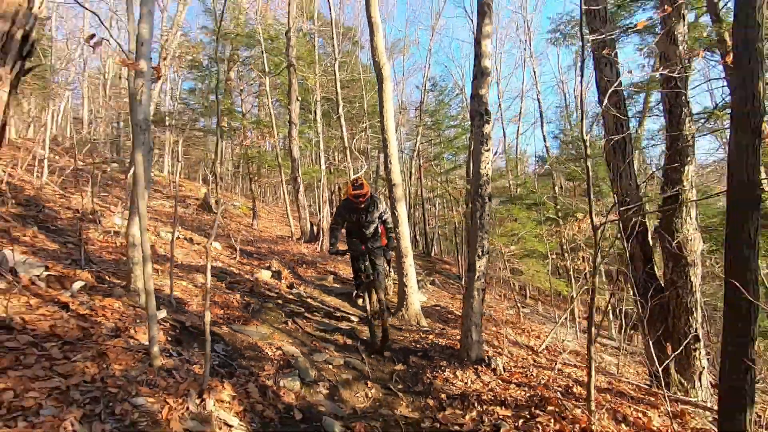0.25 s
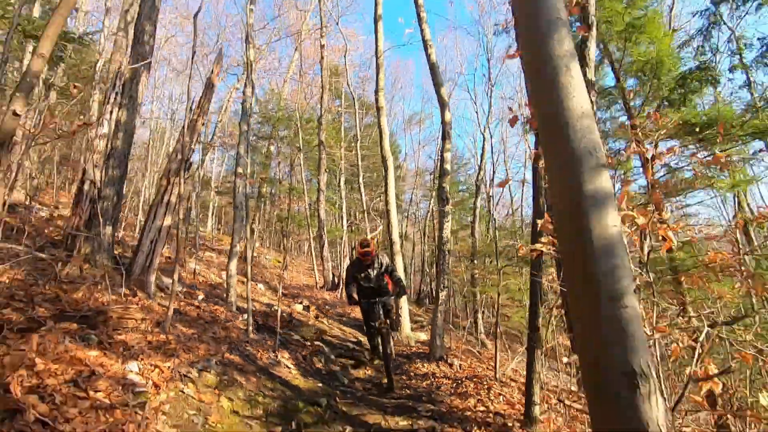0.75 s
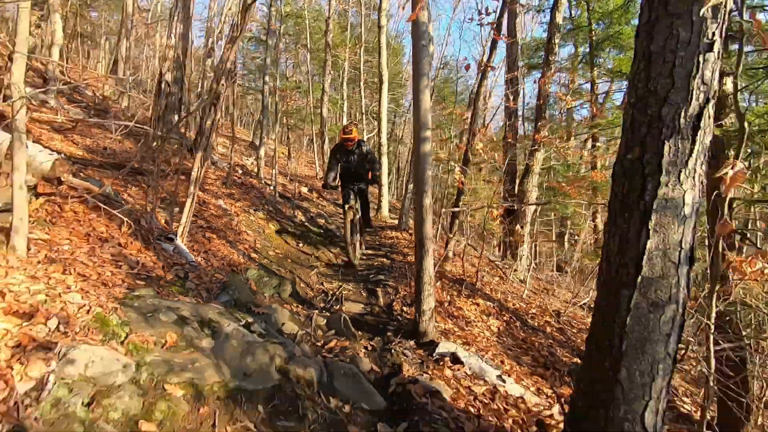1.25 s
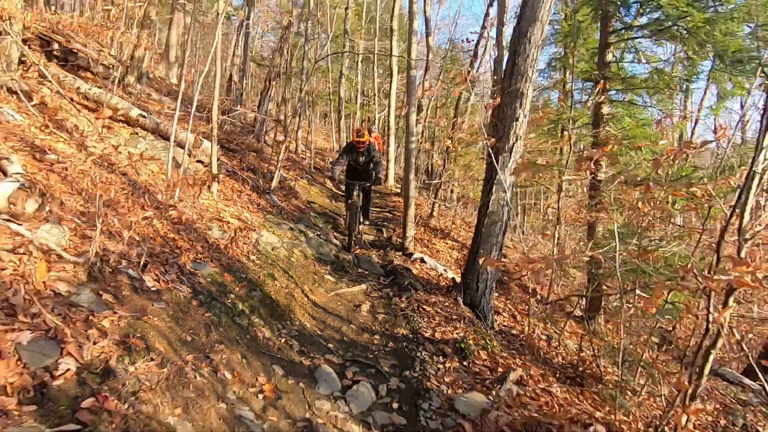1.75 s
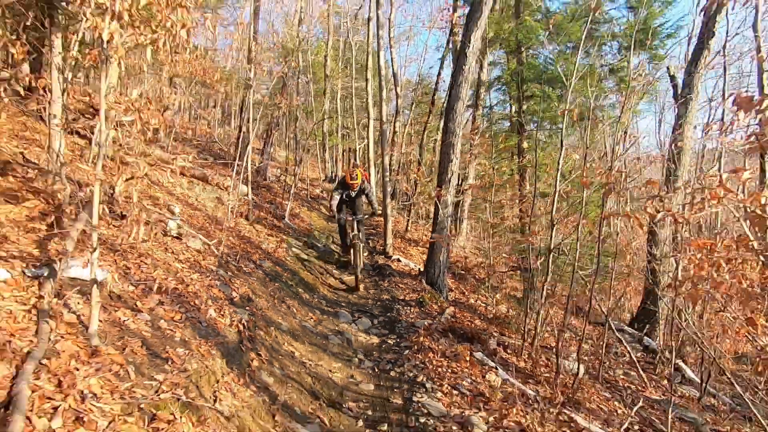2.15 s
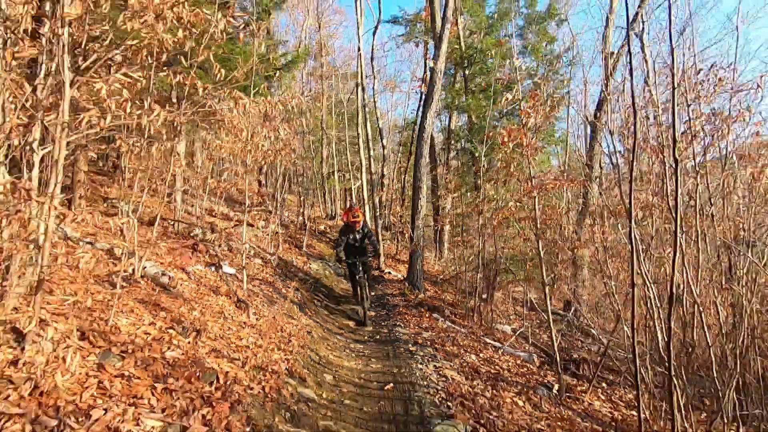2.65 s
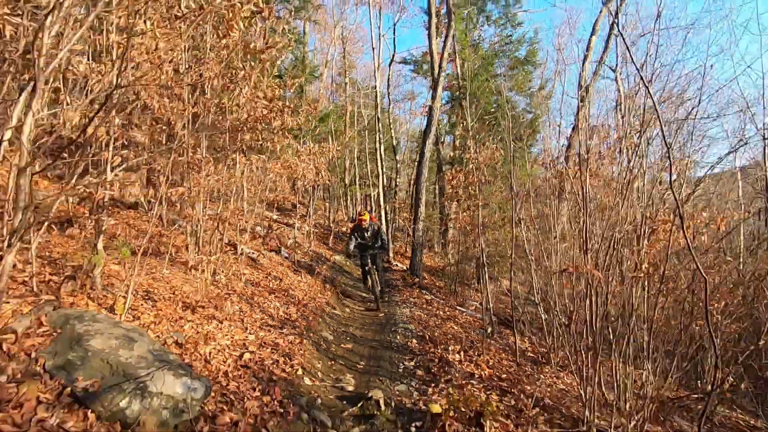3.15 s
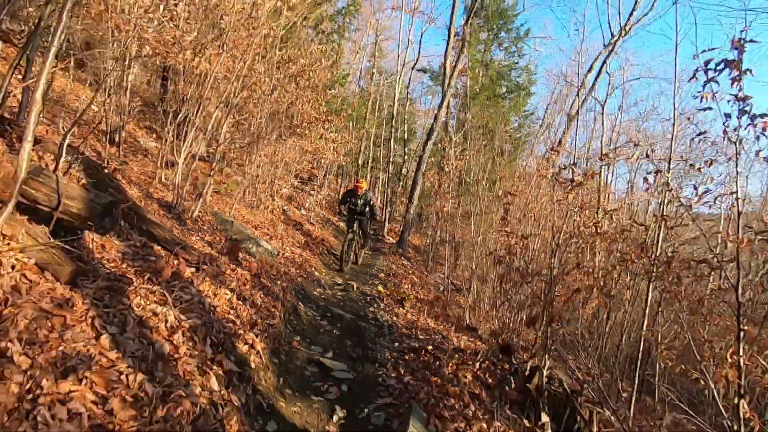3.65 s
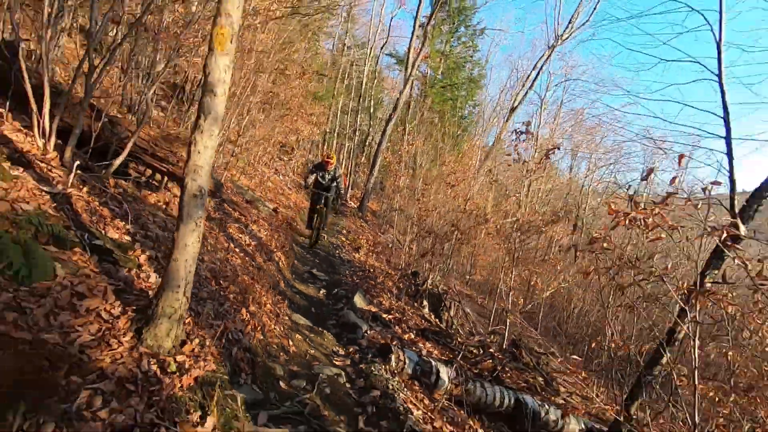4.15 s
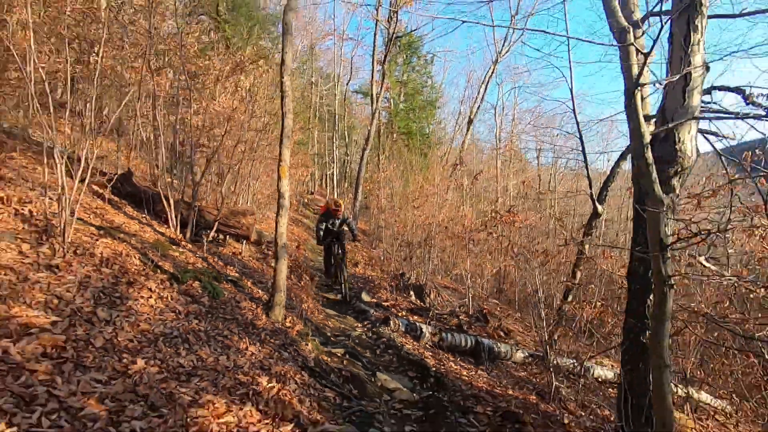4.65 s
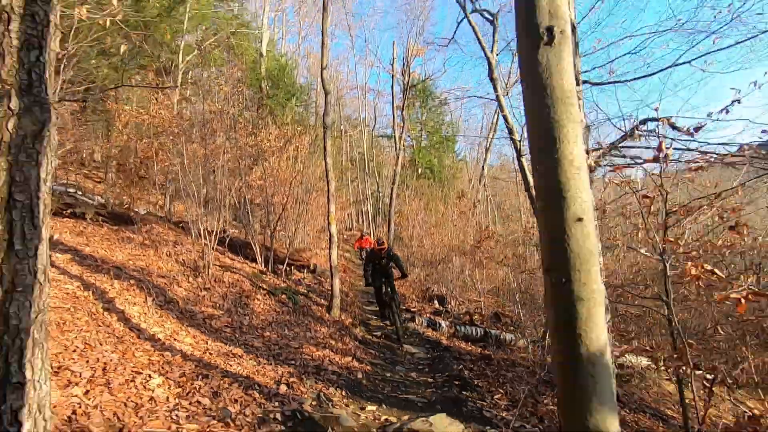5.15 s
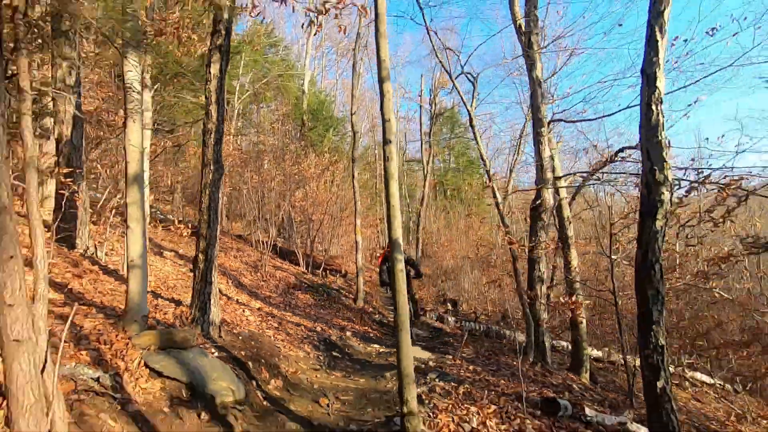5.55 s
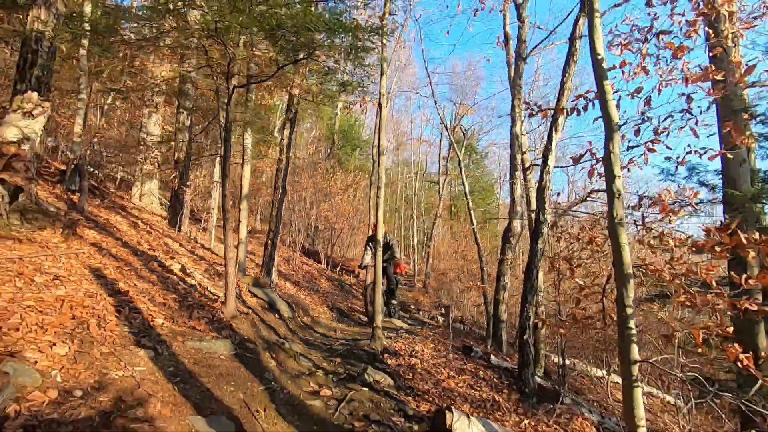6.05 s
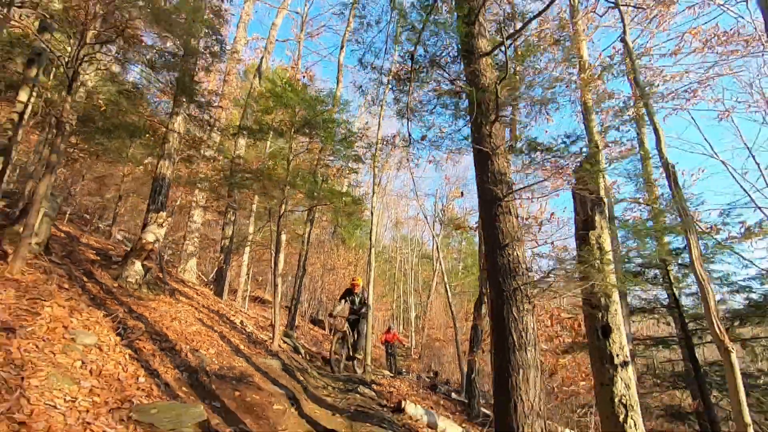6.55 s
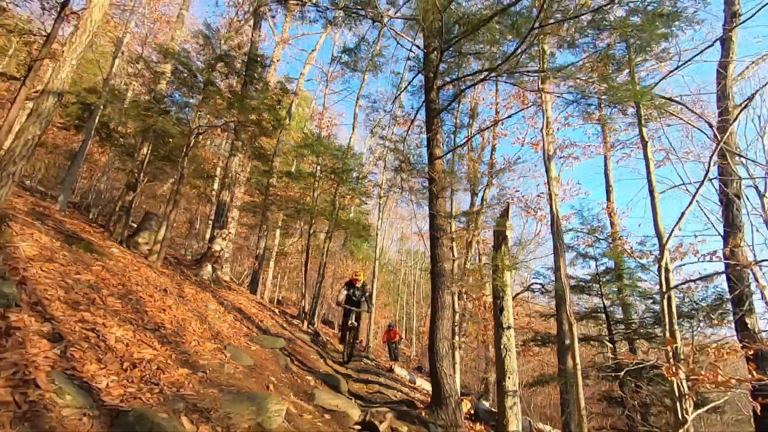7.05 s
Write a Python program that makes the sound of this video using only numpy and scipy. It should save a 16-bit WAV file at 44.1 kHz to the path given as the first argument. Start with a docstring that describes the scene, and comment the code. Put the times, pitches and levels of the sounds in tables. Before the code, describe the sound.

A covered microphone rides a mountain bike down a steep, leaf-strewn forest trail; everything is close, dry and dull in the top treble. From 0 to 1.3 s, uneven low wind flutters and thumps while loose parts tick often, with a hard frame knock near 0.65 s and a bright clack at 0.9 s. Rattles thin out until about 1.9 s. Wind strengthens, with heavy buffets near 2.2, 2.85, 3.05, 4.0 and 4.45 s, brief dropouts between, and scattered dull knocks. Around 4.9 to 5.6 s the wind eases, exposing tyre hiss, leaf crackle and denser ticking. Buffets return from 5.75 s, with a strong knock at 6.2 s, a rattle at 6.3 s and a heavy push near 6.5 s. The sharpest metallic clatter hits around 6.82 to 6.88 s with a leaf surge. Ticks cluster near 7.1 s, and a duller swell of leaf noise ends it at 7.3 s.

```python
"""Wind on a microphone that rides a mountain bike down a steep forest trail: eddies pass as random swings
of pressure, their strength set by gusts, and single strong eddies push and rebound.
Close below, tyres hiss and crackle through dry leaves: coloured noise and small ringing ticks.
Loose parts of the bike rattle as noisy ticks that ring damped modes; knocks through the frame ring one.
The covered microphone dulls the top treble."""
import sys
import numpy as np
from scipy import signal
from scipy.io import wavfile
from scipy.ndimage import uniform_filter1d

SR = 44100
rng = np.random.default_rng(int(sys.argv[2]) if len(sys.argv) > 2 else 0)


def persist_wave(psi):
    """Save psi, clipped to +-1, as 16-bit WAV."""
    counts = np.round(np.clip(psi, -1, 1) * 32767).astype(np.int16)
    wavfile.write(sys.argv[1], SR, np.atleast_2d(counts).T)


N = 321776

# Gusts at the microphone: peak_s, length_s, large_eddies_db, small_eddies_db
GUSTS = [(0.026, 0.043, -25.5, -32), (0.111, 0.49, -47.5, -36.5), (0.184, 0.23, -28.5, -35.5),
         (0.422, 0.47, -35, -34), (0.567, 0.16, -22.5, -28), (0.653, 0.32, -25.5, -32.5),
         (0.798, 0.28, -23, -25.5), (0.864, 0.07, -22, -48), (1.007, 0.37, -24, -28),
         (1.13, 0.067, -26, -38), (1.176, 0.2, -20.5, -23), (1.248, 0.077, -27, -51),
         (1.301, 0.04, -25, -33), (1.382, 0.29, -19.5, -28.5), (1.466, 0.22, -21, -29.5),
         (1.59, 0.09, -39, -33), (1.753, 0.014, -24, -30), (1.793, 0.44, -26, -40.5),
         (1.96, 0.029, -17, -44), (2.02, 0.032, -28, -45), (2.055, 0.046, -24, -27),
         (2.097, 0.14, -22, -31), (2.147, 0.037, -50, -28.5), (2.206, 0.063, -11.5, -24),
         (2.504, 0.068, -28, -25), (2.578, 0.073, -28, -29), (2.656, 0.13, -21, -44),
         (2.666, 0.12, -29, -31), (2.76, 0.13, -26, -31.5), (2.848, 0.23, -16.5, -20.5),
         (2.937, 0.073, -18.5, -32), (3.05, 0.19, -23, -34.5), (3.221, 0.058, -26, -35.5),
         (3.379, 0.12, -23.5, -30), (3.488, 0.045, -22, -41), (3.56, 0.066, -27, -28.5),
         (3.645, 0.17, -25.5, -27.5), (3.743, 0.062, -18, -38), (3.795, 0.042, -32, -26),
         (3.831, 0.23, -18.5, -31), (3.896, 0.11, -33, -27.5), (4.013, 0.076, -16, -24.5),
         (4.05, 0.36, -23, -33.5), (4.214, 0.068, -24, -51), (4.386, 0.12, -19, -36.5),
         (4.462, 0.058, -11, -27.5), (4.642, 0.085, -18.5, -30), (4.707, 0.039, -38, -34.5),
         (4.908, 0.26, -35, -42.5), (5.102, 0.51, -53, -39.0), (5.272, 0.38, -34.5, -35.5),
         (5.474, 0.48, -32.5, -30.5), (5.672, 0.26, -29.5, -31.5), (5.757, 0.089, -22, -23.5),
         (5.832, 0.084, -21, -24), (5.933, 0.3, -22, -33), (6.11, 0.17, -24, -33.5),
         (6.228, 0.22, -29, -34.5), (6.362, 0.095, -20.5, -32), (6.482, 0.22, -21.5, -26.5),
         (6.714, 0.12, -23.5, -28.5), (6.809, 0.29, -27.5, -33), (7.044, 0.12, -33, -37),
         (7.178, 0.28, -29.5, -36), (7.281, 0.067, -25, -20)]
# Slowly changing wind level beneath the gusts: time_s, large_eddies_db
WIND_BETWEEN_GUSTS = [(0.0, -43), (1.22, -36.5), (2.43, -26), (3.65, -32), (4.87, -35.5), (6.08, -46.5),
                      (7.3, -29.5)]
# Moments when the wind drops out: centre_s, half_length_s, depth_db
WIND_DROPS = [(1.08, 0.027, -9.5), (2.785, 0.0096, -8.5), (2.923, 0.021, -14), (3.03, 0.014, -15),
              (3.187, 0.029, -5.5), (3.77, 0.024, -8.5), (3.953, 0.043, -3.5), (4.187, 0.016, -8),
              (4.668, 0.02, -12), (4.836, 0.04, -6.5), (5.035, 0.023, -6), (6.052, 0.057, -5.5)]
# Eddy sizes: swing_hz, level_db (on the gust level), small_eddy_share (0 follows the large eddies, 1 the
# small; beyond 1 overshoots), density (mean eddies per swing), flutter_db (negative swells in opposition)
EDDY_SIZES = [(31, -4.5, 0.11, 2.1, 6.5), (50.5, -5.5, 0.012, 1.4, -2.5), (90.4, -2, 0.11, 1.1, 3),
              (162, -5, 0.26, 1.1, 4.5), (287.3, -4, 0.65, 1.1, 6), (471.6, -4, 1.035, 1.1, 6),
              (876, -7, 1.51, 1.1, 6), (1400, -13.5, 1.47, 0.9, 9)]
# Tyres in leaf litter: time_s, level_db (relative), crispness (dB per octave above 3 kHz)
TYRES_IN_LEAVES = [(0.0, -48.5, 9), (0.13, -50.5, 0.5), (0.3, -44, 4.5), (0.55, -43.5, 4), (0.8, -48, 10),
                   (1.0, -45, 5), (1.2, -50.5, 5.5), (1.36, -48, 4.5), (1.68, -50.5, 2), (1.95, -48, 2),
                   (2.28, -51.5, 1.5), (2.44, -46, 4), (2.63, -49.5, 0.5), (2.8, -49, 4),
                   (3.27, -51.5, 5.5), (3.4, -47, 5.5), (3.54, -54, 5), (3.75, -53.5, 6), (4.07, -46, 3.5),
                   (4.3, -54, 2), (4.5, -52, 4), (4.63, -48.5, 3.5), (4.85, -49.5, 0.5), (5.0, -46.5, 0),
                   (5.18, -47.5, 7), (5.5, -46.5, 4.5), (5.75, -46.5, 3.5), (6.1, -50, -1), (6.27, -43, 5),
                   (6.5, -46, 5.5), (6.66, -50.5, 0), (6.82, -39.5, 4), (6.94, -49, 0.5), (7.12, -47, -4),
                   (7.25, -53.5, 4.5), (7.3, -31.5, -8)]
# Colour of leaf litter as heard through the microphone: frequency_hz, density_db (relative, per Hz)
LITTER_COLOUR = [(350, -29), (600, -1.5), (1130, -1), (1610, -2.5), (2180, -4.5), (3140, -4.5),
                 (4500, -13.5), (5400, -17.5), (6510, -22.5), (8010, -24), (9850, -31.5), (11000, -39.5),
                 (14300, -54), (22000, -120)]
# Single strong eddies: centre_s, level_db (before trim), swing_hz
STRONG_EDDIES = [(0.0248, -20.5, 247), (0.1237, -18, 382), (0.212, -16, 149), (0.397, -17, 214),
                 (0.4607, -15, 174), (0.5565, -18, 221), (0.5739, -14, 241), (0.599, -13, 158),
                 (0.62, -29, 170), (1.186, -21, 197), (1.202, -14, 333), (1.372, -17, 109),
                 (1.389, -12, 174), (1.6119, -20.5, 182), (1.791, -15, 292), (1.855, -21, 174),
                 (2.2091, -23, 158), (2.238, -24, 122), (2.5145, -12, 413), (2.5924, -12.5, 380),
                 (2.6683, -19, 147), (2.7078, -14, 168), (2.828, -10, 218), (2.865, -7, 144),
                 (2.873, -10, 265), (2.879, -10, 258), (3.046, -11.5, 247), (3.059, -7, 77.5),
                 (3.5677, -20.5, 220), (3.6226, -21, 360), (3.8085, -13.5, 179), (3.836, -23, 161),
                 (3.908, -15, 228), (4.0045, -11.5, 151), (4.026, -21, 91), (4.391, -22, 145),
                 (4.409, -13, 186), (4.459, -13, 166), (4.4729, -12.5, 190), (4.6434, -15.5, 123),
                 (4.969, -22, 242), (5.092, -22.5, 158), (5.6868, -15.5, 200), (5.7568, -22, 493),
                 (5.8348, -11.5, 172), (5.9412, -20, 129), (5.9568, -24, 206), (6.109, -10, 143),
                 (6.225, -17.5, 155), (6.368, -17.5, 121), (6.4728, -10, 106), (6.4877, -7, 188),
                 (6.7062, -27, 282), (6.8246, -25, 300), (6.8493, -17, 370), (6.912, -25, 200)]
# Rattles: tick_s, treble_peak_db (before trim), low_parts_db, high_parts_db, struck_part_hz
RATTLE_HITS = [(0.045, -38, 23, -24, 4080), (0.1665, -30, -5, -15, 2900), (0.199, -30.5, -9, -2, 8100),
               (0.266, -31, 13, 2, 2820), (0.317, -31, 2, 3, 2900), (0.3362, -22.5, 18, -9, 3470),
               (0.405, -31, -7, -2, 3600), (0.4424, -29.5, 0, -1, 2790), (0.459, -36, 2, -11, 3480),
               (0.5, -30, 2, -3, 3570), (0.511, -28, 1, -3, 2650), (0.567, -26, -1, 1, 7210),
               (0.576, -37, 2, 1, 3320), (0.7368, -23, 8, -15, 4100), (0.75, -23, -4, -6, 3530),
               (0.8, -20, -13, 0, 8330), (0.9001, -13, -20, 20, 3300), (0.907, -27, -5, 5, 2700),
               (0.949, -25, -15, -3, 5030), (0.9525, -25, -17, 5, 4500), (0.9917, -39, 8, -20, 2700),
               (1.063, -29, -8, -21, 3970), (1.2067, -26.5, -8, -4, 3850), (1.227, -33.5, -9, -17, 2720),
               (1.274, -36, 15, -17, 2800), (1.711, -39.5, 0, -26, 2500), (1.802, -42, 0, -25, 2400),
               (1.8788, -26, 3, -28, 4600), (2.151, -33, 19, -30, 4470), (2.285, -39, 14, -25, 3060),
               (2.323, -31.5, 5, -28, 3650), (2.336, -31, 0, -26, 4270), (2.35, -39, 10, -22, 2740),
               (2.4352, -32.5, 26, -21, 3000), (2.5, -32, 8, -28, 2630), (2.535, -35.5, -15, -25, 2780),
               (2.6656, -27, 1, -7, 4030), (2.727, -28.5, -6, -20, 3480), (2.7848, -34.5, -15, 0, 2860),
               (2.823, -32.5, 3, -14, 2530), (2.8632, -35, 22, -20, 2370), (2.982, -37.5, 0, -10, 3530),
               (3.063, -44, 21, -15, 2690), (3.105, -42, 19, -14, 3200), (3.196, -36.5, -14, -8, 2610),
               (3.351, -27, 3, -27, 3440), (3.3926, -33, -5, -5, 2460), (3.505, -32.5, -7, -1, 3500),
               (3.6854, -28, 2, -19, 4660), (3.737, -31.5, 2, 0, 3560), (3.812, -30.5, -8, -8, 3880),
               (3.869, -29.5, 5, 5, 4630), (3.89, -38, 10, -17, 2700), (3.9117, -30.5, -7, -20, 5070),
               (4.065, -32, 32, -18, 2440), (4.105, -30, 23, -15, 4350), (4.2783, -37, -12, -11, 2630),
               (4.331, -26.5, -15, -13, 7100), (4.372, -37, 1, -16, 2930), (4.439, -33.5, -11, -2, 3430),
               (4.543, -32, -12, -18, 3280), (4.5783, -33.5, 11, -15, 3000), (4.9668, -33, 7, -19, 5350),
               (5.0623, -23.5, 0, -4, 7100), (5.19, -34.5, -9, -11, 2700), (5.226, -36, -8, -6, 3930),
               (5.267, -32, 1, -12, 2780), (5.282, -25.5, -21, -7, 3000), (5.3072, -30, -10, -3, 2920),
               (5.3932, -25, -7, 11, 7200), (5.428, -25.5, -8, -1, 4030), (5.518, -28, -3, 0, 5350),
               (5.528, -31, 10, 0, 4900), (5.681, -32, 2, -6, 2870), (5.734, -29.5, -5, -12, 3100),
               (5.7964, -35, -10, -17, 4700), (5.868, -26.5, -9, -12, 4500), (6.033, -29.5, 4, 0, 5760),
               (6.08, -31.5, -6, 6, 5430), (6.105, -38, 13, 14, 2440), (6.17, -26, -0.5, -7, 2900),
               (6.29, -17.5, -8, 10, 2500), (6.3402, -30, 0, -1, 8100), (6.3462, -26, -11, -4, 3300),
               (6.404, -35, 5, 5, 3060), (6.429, -27.5, -10, -4, 7170), (6.5075, -26.5, 7, -16, 2360),
               (6.5425, -25, 4, -5, 8240), (6.5922, -20, -12, 6, 7500), (6.743, -40, -3, 0, 2960),
               (6.807, -30, 7, -2, 3970), (6.819, -7, -3, 10, 5340), (6.8299, -14, 8, 10, 8600),
               (6.836, -33, 0, 0, 5300), (6.8833, -16.5, -4, 21, 9600), (6.916, -33, 8, -9, 4350),
               (7.041, -29, 8, -14, 4450), (7.0658, -26, -8, -27, 4000), (7.097, -24.5, -3, -5, 4670),
               (7.106, -20.5, 1, -1, 4270), (7.118, -22.5, -18.5, 7, 4700)]
# Modes of the loose parts: frequency_hz, width_hz (wider dies sooner), level_db (relative)
LOOSE_PARTS = [(1700, 120, 10.5), (2780, 280, 17), (4270, 900, 17), (5260, 1300, 15), (7100, 2800, 16.5),
               (8330, 4100, 17.5), (11000, 1200, -16), (13500, 3000, 6)]
# Knocks through the frame: time_s, level_db (before trim), mode_hz, t60_s (at least 5 ms is used)
FRAME_KNOCKS = [(0.1021, -28, 790, 0.036), (0.2654, -26, 1617, 0.056), (0.336, -31.5, 1440, 0.21),
                (0.6446, -14, 885, 0.022), (0.8175, -30, 920, 0.048), (0.856, -35.5, 1140, 0.043),
                (0.9035, -23, 5600, 0.039), (0.985, -27, 1130, 0.04), (1.1645, -18, 686, 0.016),
                (1.341, -20, 914, 0.043), (1.348, -25, 1530, 0.054), (1.362, -23, 1400, 0.063),
                (1.565, -27, 1490, 0.027), (1.655, -25.5, 1340, 0.02), (1.879, -25.5, 680, 0.031),
                (1.8797, -19, 1840, 0.02), (2.0516, -21.5, 736, 0.013), (2.201, -34, 1230, 0.02),
                (2.2252, -20, 750, 0.029), (2.5141, -22.5, 700, 0.044), (2.7482, -22, 765, 0.025),
                (2.809, -27, 910, 0.017), (2.826, -24, 1690, 0.015), (2.83, -14.5, 890, 0.022),
                (2.844, -38, 900, 0.02), (2.864, -13, 890, 0.017), (2.8785, -23, 887, 0.04),
                (3.104, -25, 660, 0.031), (3.3487, -23, 1400, 0.027), (3.394, -20.5, 725, 0.022),
                (3.5729, -31, 1000, 0.043), (3.620, -24.5, 710, 0.017), (3.638, -35, 1700, 0.016),
                (3.6536, -25, 1160, 0.03), (3.7905, -23.5, 696, 0.018), (3.799, -36, 810, 0.021),
                (3.8983, -42, 785, 0.04), (4.003, -22, 786, 0.032), (4.066, -24, 945, 0.025),
                (4.372, -30.5, 1510, 0.03), (4.622, -28.5, 1110, 0.031), (4.691, -23.5, 1380, 0.028),
                (4.971, -21.5, 858, 0.047), (5.054, -22, 910, 0.043), (5.311, -17.5, 874, 0.031),
                (5.409, -22.5, 890, 0.04), (5.421, -25, 1020, 0.037), (5.436, -24, 870, 0.03),
                (5.4873, -19.5, 654, 0.043), (5.567, -24, 1005, 0.034), (5.764, -18.5, 1176, 0.026),
                (5.864, -28, 1400, 0.032), (5.9184, -26.5, 1400, 0.032), (6.154, -21, 900, 0.028),
                (6.2199, -11.5, 875, 0.022), (6.471, -24, 840, 0.033), (6.511, -16.5, 980, 0.047),
                (6.71, -20, 1322, 0.065), (6.796, -24.5, 1037, 0.064), (6.874, -28, 1943, 0.09),
                (6.8835, -16, 1917, 0.037), (6.93, -21, 1150, 0.018), (7.0527, -27, 940, 0.12),
                (7.276, -22, 1024, 0.032), (7.285, -28, 790, 0.024)]
# Treble response of the covered microphone: frequency_hz, gain_db
MICROPHONE_RESPONSE = [(9500, -2), (10600, -12.5), (11200, -18.5), (12000, -23), (14500, -19), (15600, -38)]

RISE_SHARE = 0.35  # share of a gust's length on the rising side
LARGE_DROP_DB, SMALL_DROP_DB = 15, 26.5  # fall from the peak at one rise or decay length
SMALL_BETWEEN_DB = -18  # small eddies against large ones beneath the gusts
CLEAN_HZ = 1200  # knocks above this ring with less roughness
EDGE_HZ = 15700  # upper band limit


def gain_of(db):
    """Amplitude gain of a level in dB."""
    return 10 ** (np.asarray(db) / 20)


def evened(x):
    """Scale a signal to an RMS of one."""
    return x / np.sqrt(np.mean(x ** 2) + 1e-20)


def read(points, hz):
    """Read a response curve between its points on a log-frequency axis."""
    f, value = np.transpose(points)
    return np.interp(np.log(hz + 1), np.log(f + 1), value)


def follow(rows, t):
    """Join each column of timed rows with straight lines."""
    s, *columns = np.transpose(rows)
    return [np.interp(t, s, column) for column in columns]


def add(mix, s, sound):
    """Lay a sound into the mix at s seconds, cut at the end."""
    part = mix[max(round(s * SR), 0):][:len(sound)]
    part += sound[:len(part)]


def wander(hz):
    """Smooth chance: noise kept to variations slower than about hz."""
    return evened(signal.lfilter(*signal.butter(2, hz, fs=SR), rng.standard_normal(N)))


def swing(hz, turns, phase):
    """A short swing of pressure under a bell-shaped window, with no net push."""
    u = np.arange(-3 * turns, 3 * turns, hz / SR)
    bell = np.exp(-0.5 * (u / turns) ** 2)
    wave = bell * np.cos(2 * np.pi * u + phase)
    return wave - bell * wave.sum() / bell.sum()


def gusts():
    """Each gust rises fast and dies slower; small eddies fall further from their peak than large ones."""
    t = np.arange(0, N + 128, 128) / SR
    s, length, large_db, small_db = np.transpose(GUSTS)
    u = (t[:, None] - s) / length
    away = np.where(u < 0, -u / RISE_SHARE, u / (1 - RISE_SHARE)) ** 1.45
    between_db, = follow(WIND_BETWEEN_GUSTS, t)

    def power(peak_db, drop_db, under_db):
        """Overlapping gusts and the wind beneath them add as powers."""
        gust_power = (gain_of(peak_db - drop_db * away) ** 2).sum(1)
        return gust_power + gain_of(under_db) ** 2

    large = power(large_db, LARGE_DROP_DB, between_db)
    small = power(small_db, SMALL_DROP_DB, between_db + SMALL_BETWEEN_DB)
    s, half_length, depth_db = np.transpose(WIND_DROPS)
    calm_db = (depth_db * np.exp(-((t[:, None] - s) / half_length) ** 4)).sum(1)
    samples_s = np.arange(N) / SR
    return [np.interp(samples_s, t, 10 * np.log10(p) + calm_db) for p in (large, small)]


def wind():
    """Eddies of every size pass the microphone at random moments; one flutter links their strengths."""
    large_db, small_db = gusts()
    flutter = np.tanh(wander(52.7))
    out = np.zeros(N)
    for hz, db, share, density, flutter_db in EDDY_SIZES:
        size = rng.standard_normal(N)
        passes = rng.random(N) < density * hz / SR
        layer = evened(signal.oaconvolve(size * passes, swing(hz, 0.35, 0.53), "same"))
        # even out slow chance changes of level, so the gusts set the strength
        local_power = uniform_filter1d(layer ** 2, int(2 * SR / hz + 0.0146 * SR))
        layer /= np.sqrt(abs(local_power) + 0.7)
        # smooth the flutter over one swing of this size
        slow_flutter = uniform_filter1d(flutter, int(SR / hz))
        layer = evened(layer * gain_of(flutter_db * slow_flutter))
        out += layer * gain_of((1 - share) * large_db + share * small_db + db)
    return 0.64 * np.tanh(out / 0.51)  # the strongest wind peaks are softly limited


def grit():
    """Small stones and leaf ribs snap under the tyre: each tick rings a few cycles at its own pitch."""
    out = np.zeros(N)
    for hz in np.geomspace(450, 9000, num=16):
        u = np.arange(0, 24, hz / SR)  # cycles
        tick = hz * (1 - np.exp(-u)) * np.exp(-u / 1.8) * np.sin(2 * np.pi * u)
        happens = rng.random(N) < 120.0 / SR  # 120 snaps a second at each pitch, on average
        strength = gain_of(2.96 * np.minimum(rng.exponential(1, N), 3))
        out += signal.oaconvolve(happens * strength, tick)[:N]
    return evened(out)


def leaves():
    """A patchy hiss of many far leaves and the crackle of near ones, under one colour."""
    grit_share, far_share = 0.9, 0.5
    near = rng.standard_normal(N) + grit_share * grit()
    near = evened(near * gain_of(2.9 * wander(27.3)))
    drive = near + far_share * rng.standard_normal(N)  # far leaves hiss evenly
    hz, t, z = signal.stft(evened(drive), SR, nperseg=512, noverlap=384)

    wide, thin = rng.standard_normal((len(t), len(hz), 2)).T
    # each leaf has its own colour: broad in frequency, short in time
    wide = evened(uniform_filter1d(uniform_filter1d(wide, 8, 0), 5, 1))
    # grit rings for a moment: narrow in frequency, longer in time
    thin = evened(uniform_filter1d(uniform_filter1d(thin, 2, 0), 16, 1))
    patchy_db, gritty_db = 1.3, 1.8

    level_db, crisp_db = follow(TYRES_IN_LEAVES, t)
    # the microphone's loss is undone here, as it is applied to the whole mix later
    colour = gain_of(read(LITTER_COLOUR, hz) - read(MICROPHONE_RESPONSE, hz))
    level_band = (hz > 2000) * (hz < 5000)
    colour /= np.sqrt(np.mean(colour ** 2 * level_band))
    treble = np.clip(np.log2((hz + 1) / 3000), 0, 1.5)  # octaves above 3 kHz
    moving_db = level_db + treble[:, None] * crisp_db + patchy_db * wide + gritty_db * thin
    z = z * colour[:, None] * gain_of(moving_db)
    return signal.istft(z, SR, nperseg=512, noverlap=384)[1][:N]


def buffets():
    """Each strong eddy pushes on the microphone and rebounds."""
    out = np.zeros(N)
    phases = rng.uniform(-np.pi, np.pi, (len(STRONG_EDDIES), 1))
    for (s, db, hz), phase in zip(STRONG_EDDIES, phases):
        push = swing(hz, 0.57, phase)
        add(out, s - len(push) / 2 / SR, gain_of(db - 1.5) * push)
    return out


def ring_of_parts(low_db, top_db, struck_hz, mix):
    """Loose parts ring together as damped sines; the struck part stands out."""
    t = np.arange(400) / SR
    modes = [(hz, width, part_db + low_db * (hz < 3500) + top_db * (hz > 6500))
             for hz, width, part_db in LOOSE_PARTS]
    loudest_db = max(mode[2] for mode in modes[1:-2])  # lowest and two highest parts left out
    modes.append((struck_hz, 0.1 * struck_hz, loudest_db + 4))
    ring = np.zeros(len(t))
    for (hz, width, mode_db), chance_db in zip(modes, mix):
        level = gain_of(mode_db + 2 * chance_db) * np.sqrt(width)
        ring += level * np.exp(-np.pi * width * t) * np.sin(2 * np.pi * hz * t)
    return ring


def rattles():
    """A short noisy swell, one sharp tick, then a fading scatter; all ring briefly in the loose parts."""
    out, t = np.zeros(N), np.arange(3000) / SR
    lead, clean = 0.015, 0.55  # time before the tick (s), share of the clean core
    treble = signal.butter(2, [3500, 10000], "band", fs=SR)
    u = t - lead
    tick = np.exp(-0.5 * (u / 0.0006) ** 2)
    at_tick = np.arange(len(t)) == round(lead * SR)
    blow = np.sqrt(np.sum(tick ** 2)) * at_tick  # the clean core of the tick
    swell_before = 0.33 * np.exp(np.minimum(u, 0) / 0.009)
    scatter_after = 0.4 * gain_of(-60 * u / 0.065)
    around = np.where(u < 0, swell_before, scatter_after)
    noise = rng.standard_normal((len(RATTLE_HITS), 3000))
    mixes = rng.standard_normal((len(RATTLE_HITS), len(LOOSE_PARTS) + 1))
    for (s, db, low_db, top_db, struck_hz), chance, mix in zip(RATTLE_HITS, noise, mixes):
        # harder ticks stand further out of their swell and scatter
        around_gain = gain_of(-0.55 * (db + 19))
        strike = clean * blow + chance * (tick + around * around_gain)
        sound = signal.fftconvolve(strike, ring_of_parts(low_db, top_db, struck_hz, mix))
        # the peak is set on the treble
        treble_power = uniform_filter1d(signal.lfilter(*treble, sound) ** 2, 40).max()
        add(out, s - lead, gain_of(db - 5.5) * sound / np.sqrt(treble_power))
    return out


def knocks():
    """A sharp blow to the frame, then one damped mode rings with a little roughness."""
    out, t = np.zeros(N), np.arange(3000) / SR
    rise = 0.0009  # s
    noise = rng.standard_normal((len(FRAME_KNOCKS), 3000))
    for (s, db, hz, t60), chance in zip(FRAME_KNOCKS, noise):
        shape = (1 - np.exp(-(t / rise) ** 2)) * gain_of(-60 * t / max(t60, 0.005))
        rough = evened(uniform_filter1d(chance, 25)) * min(CLEAN_HZ / hz, 1) ** 2
        mode = (1 + 0.34 * rough) * np.sin(2 * np.pi * hz * t + rough / np.pi)
        add(out, s - 1.3 * rise, gain_of(db - 1.0) * shape * mode)
        blow = swing(0.88 * hz, 0.24, 0.16)
        add(out, s - len(blow) / 2 / SR + 0.000974, gain_of(db + 4.5) * blow)
    return out


def scene():
    """Wind, leaves and bike add up at one microphone."""
    return (wind() + buffets() + leaves() + rattles() + knocks())[None]


def record(dry):
    """The covered microphone loses the top treble; then the band limit."""
    hz = np.linspace(0, SR / 2, 513)
    cover = signal.firwin2(513, hz, gain_of(read(MICROPHONE_RESPONSE, hz)), fs=SR)
    coloured = signal.oaconvolve(dry, cover[None], "same")
    band_limit = signal.firwin(511, EDGE_HZ, window=("kaiser", 9), fs=SR)
    return signal.oaconvolve(coloured, band_limit[None], "same")


dry = scene()
out = record(dry)
persist_wave(out)
```